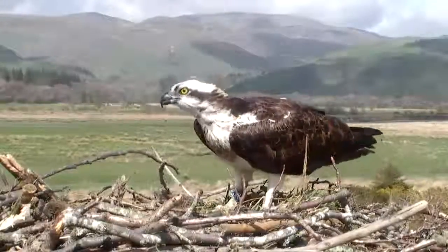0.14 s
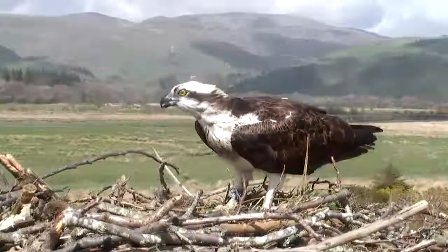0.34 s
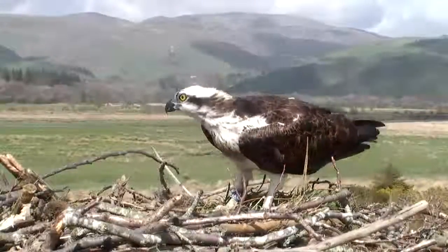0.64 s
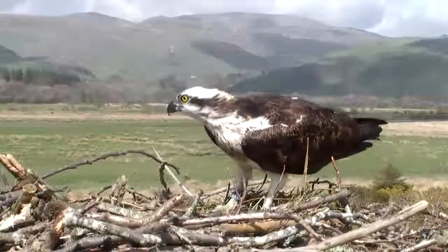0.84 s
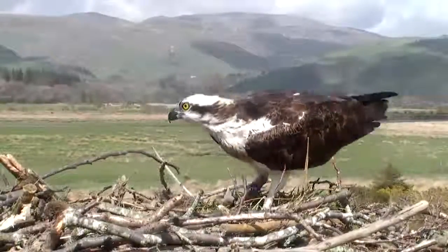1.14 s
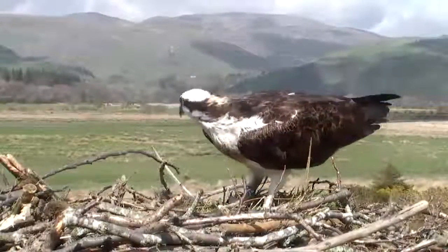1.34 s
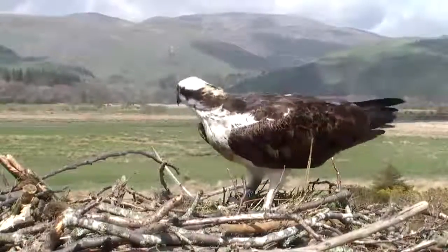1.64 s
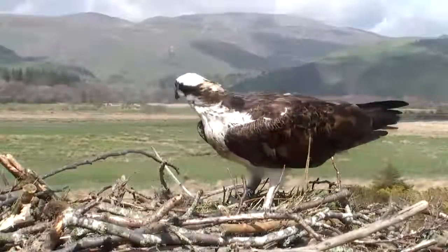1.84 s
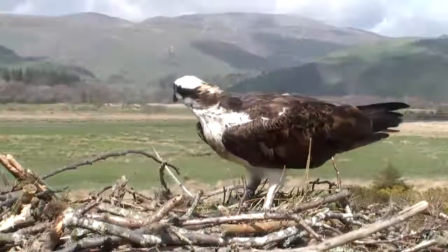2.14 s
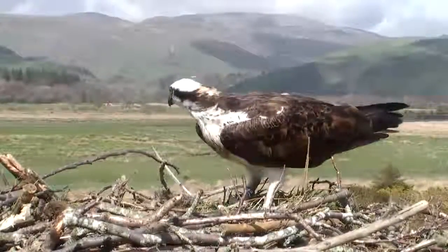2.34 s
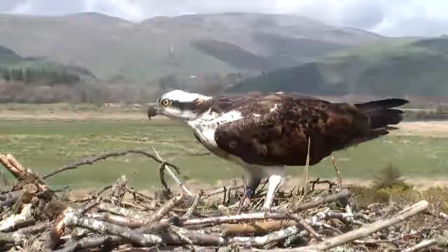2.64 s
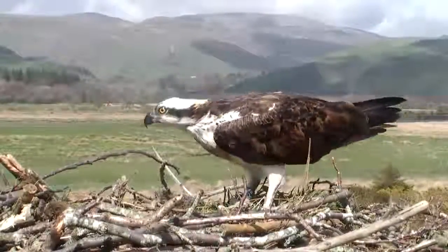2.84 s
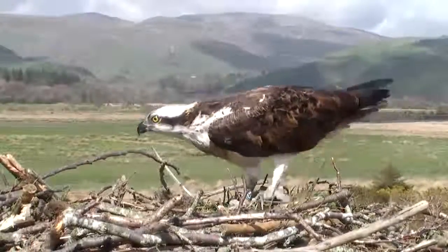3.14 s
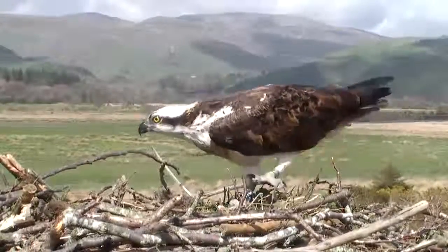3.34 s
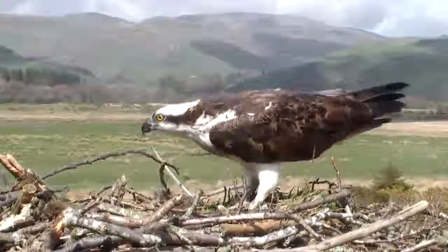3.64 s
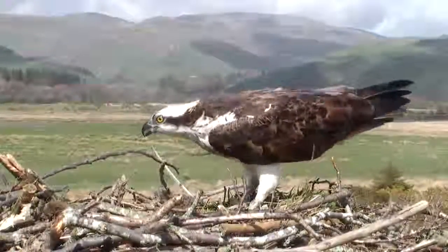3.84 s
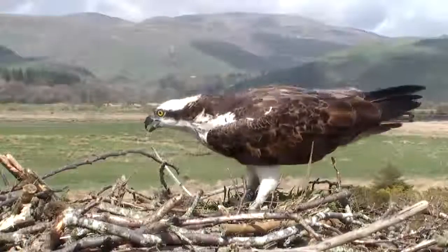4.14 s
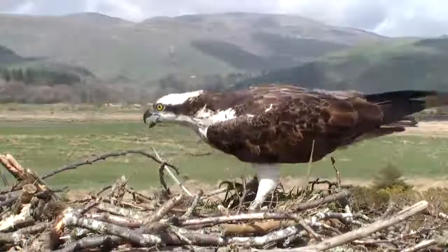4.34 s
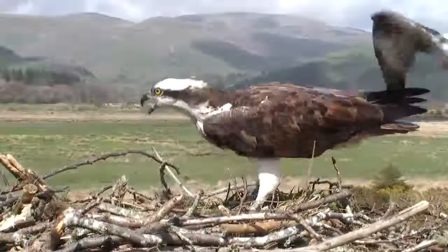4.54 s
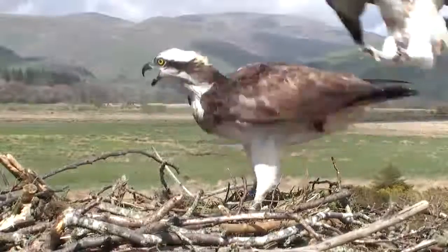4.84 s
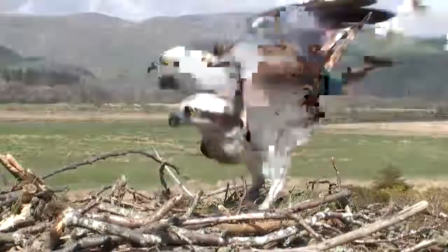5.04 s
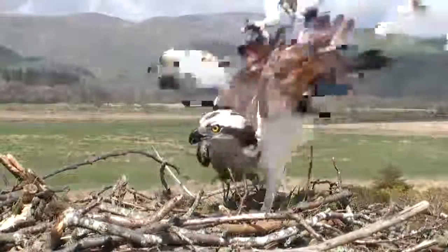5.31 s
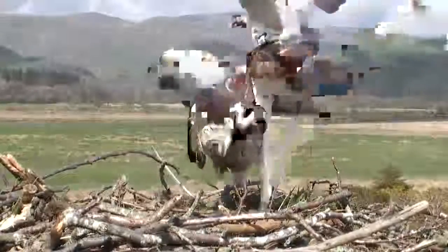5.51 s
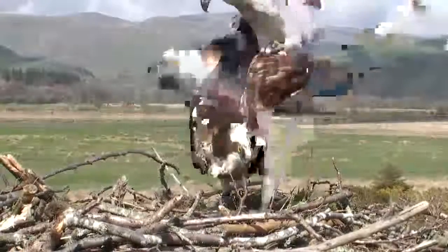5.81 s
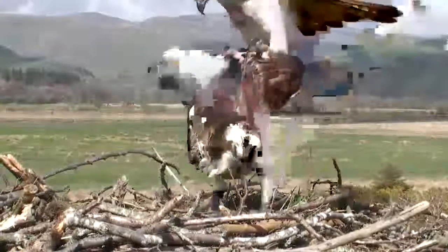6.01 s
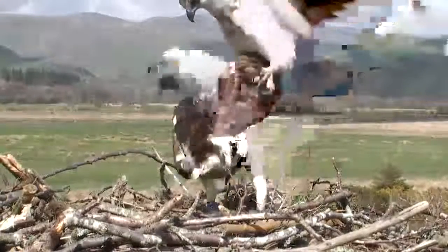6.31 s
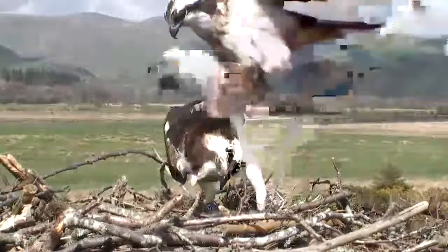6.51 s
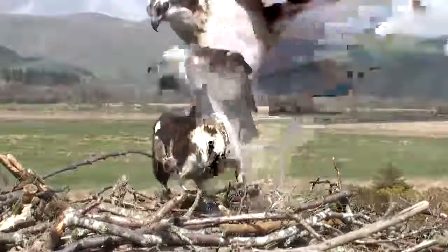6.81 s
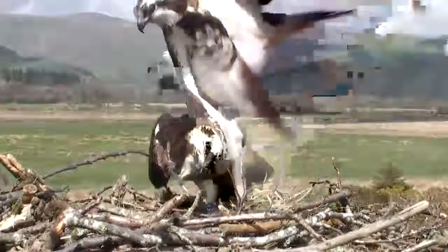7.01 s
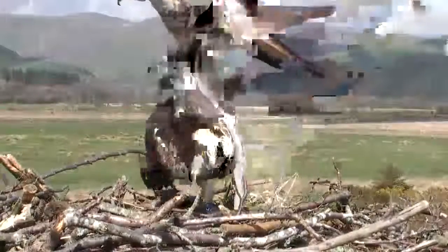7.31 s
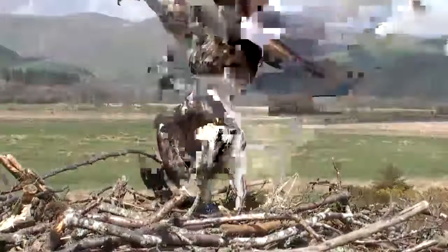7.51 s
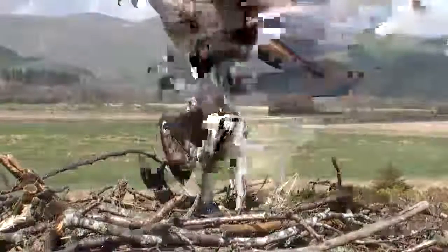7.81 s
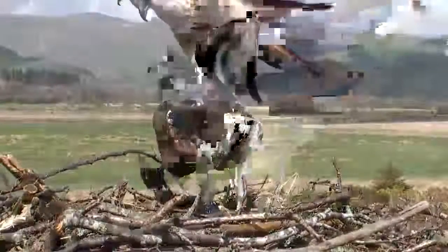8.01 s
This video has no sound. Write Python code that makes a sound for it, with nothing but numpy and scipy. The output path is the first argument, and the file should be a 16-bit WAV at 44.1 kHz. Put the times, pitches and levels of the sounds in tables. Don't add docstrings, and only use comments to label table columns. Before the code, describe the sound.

An osprey on a stick nest whistles quick raspy chirps while heavy wind gusts thump and distort the microphone and twigs snap.

```python
import sys
import numpy as np
from scipy import signal
from scipy.fft import rfft, irfft
from scipy.io import wavfile
from scipy.ndimage import uniform_filter1d, map_coordinates

SR = 44100
rng = np.random.default_rng(int(sys.argv[2]) if len(sys.argv) > 2 else 0)


def bounce(signal):
    frames = np.transpose(np.atleast_2d(signal))
    limited = np.clip(frames, -1, 1)
    pcm = np.round(limited * 32767).astype(np.int16)
    wavfile.write(sys.argv[1], SR, pcm)


def gain_from_db(level_db):
    decades = np.asarray(level_db, float) / 20
    return 10 ** decades


N = 359712


def unit(x):
    return x / np.sqrt(np.mean(x ** 2) + 1e-20)


def along(points, hz):
    f, v = np.transpose(points)
    return np.interp(np.log(hz + 1), np.log(f + 1), v)


def curve(rows):
    return np.interp(np.arange(N) / SR, *np.transpose(rows))


def swell(s, rise, hold, release):
    full = s + rise
    fading = full + hold
    return curve([(s, 0), (full, 1), (fading, 1), (fading + release, 0)])


def wobble(rate):
    return map_coordinates(rng.standard_normal(int(N * rate / SR) + 4), [np.arange(N) * rate / SR])


def smooth(x, size):
    return uniform_filter1d(uniform_filter1d(x, size=size), size=size)


def rush(spectrum, patchy_db):
    hz, _, z = signal.stft(rng.standard_normal(N), SR, nperseg=512)
    field = uniform_filter1d(rng.standard_normal(z.shape), size=5, axis=0)
    field = uniform_filter1d(field, size=10, axis=1)
    x = signal.istft(z * gain_from_db(patchy_db * unit(field)), nperseg=512)[1][:N]
    return unit(irfft(rfft(x) * gain_from_db(along(spectrum, np.fft.rfftfreq(N, 1 / SR))), N))


def clip(x, top, hard):
    return x / (1 + np.abs(x / top) ** hard) ** (1 / hard)


# f/Hz, level/dB
HISS_COLOUR = [(3530, 1), (6000, -8.5), (6910, -5.5), (8260, -9), (14000, -3.5), (15800, -11)]


def hiss(level_db, patchy_db):
    return gain_from_db(level_db) * rush(HISS_COLOUR, patchy_db)


# t/s, level/dB
WIND_STRENGTH = [(0.0, -40), (0.32, -38.5), (0.52, -36.5), (1.04, -34), (1.41, -38.5), (1.91, -33.5),
                 (2.88, -34.5), (3.7, -39.5), (3.95, -37), (4.36, -41.5), (4.82, -39), (5.31, -39),
                 (5.61, -37.5), (6.0, -31), (6.45, -42), (6.9, -40.5), (7.3, -42.5), (8.16, -45.5)]


def wind_db():
    return curve(WIND_STRENGTH)


# t/s, rise/s, hold/s, release/s, peak level/dB
GUST_TIMES = [(-.1, 0.046, 0.07, 0.092, -28), (0.084, 0.057, 0.05, 0.42, -19.5),
              (0.257, 0.089, 0.45, 0.14, -16.5), (0.798, 0.057, .2, 0.12, -23.5),
              (1.009, 0.027, 0.18, 0.04, -17), (1.148, 0.064, 0.058, 0.22, -25),
              (1.797, 0.071, .15, 0.091, -16), (1.747, 0.25, 0.61, 0.16, -17.5),
              (2.65, 0.034, 0.014, 0.071, -18), (4.28, 0.043, .02, 0.22, -24),
              (4.47, 0.34, 0.15, 0.098, -16.5), (4.9, 0.14, 0.058, 0.14, -25),
              (5.202, 0.18, 0.893, 0.31, -17), (6.304, 0.056, 0.088, 0.055, -19),
              (6.754, 0.14, 0.055, .04, -16), (6.94, 0.069, 0.029, 0.38, -18),
              (7.398, 0.17, 0.091, 0.45, -21.5), (7.779, 0.028, 0.065, 0.11, -16.5),
              (8.032, 0.04, 0.053, 0.08, -18.5)]
# t/s, length/ms
LULL_TIMES = [(.39, 30), (.735, 24), (.785, 14), (1.12, 8), (1.148, 10), (1.205, 30), (1.97, 24),
              (2.035, 12), (2.18, 8), (2.4, 12), (2.47, 24), (4.9, 12), (4.955, 20), (4.833, 10),
              (5.588, 14), (5.804, 9), (5.89, 18), (6.053, 11), (6.2, 14), (6.3, 18)]
# t/s, length/ms
SURGE_TIMES = [(.485, 40), (.65, 90), (.76, 20), (1.07, 30), (2.08, 90), (2.25, 40), (2.44, 24),
               (4.878, 20), (4.918, 12), (5.43, 60), (5.54, 70), (5.62, 40), (5.73, 80), (5.85, 40),
               (5.93, 40), (5.98, 100), (6.11, 80)]


def gust_strength():
    calm_db, t = wind_db() + 3.5, np.arange(N) / SR
    gust_db = np.max([calm_db + (db - calm_db) * swell(*shape) for *shape, db in GUST_TIMES], axis=0)
    gust_db = gust_db + 0.95 * np.maximum(gust_db + 19, 0)
    for changes, change_db in ((LULL_TIMES, -14), (SURGE_TIMES, 9)):
        for s, ms in changes:
            gust_db = gust_db + change_db * np.exp(-((t - s) / (ms / 1600)) ** 4)
    return gust_db


# f/Hz, level per Hz/dB
FIELD_COLOUR = [(53, -32), (90, 6), (302, 1), (423, -4), (475, -5), (622, -5), (885, -18), (1010, -18.5),
                (1590, -29.5), (2350, -34), (5000, -57.5), (6500, -63.5), (11000, -120)]


def roar(gust_db):
    level_db = wind_db() + 3.5 + 0.1 * np.maximum(gust_db + 20, 0)
    level_db = level_db + 0.52 * wobble(6.1) + 0.12 * wobble(25)
    return gain_from_db(level_db) * rush(FIELD_COLOUR, patchy_db=1)


# f/Hz, level/dB
FEATHER_COLOUR = [(800, -37.5), (2000, -0.5), (3500, -4.5), (6000, -10), (9000, -17.5), (13000, -39.5)]


def spray(gust_db):
    level_db = -71.5 + 0.65 * np.clip(gust_db + 21, -15, 14) + 4 * wobble(60)
    return gain_from_db(level_db) * rush(FEATHER_COLOUR, patchy_db=4.5)


# t/s, rise/s, hold/s, release/s, level/dB
WING_BEATS = (4.53, 0.44, 1.54, 0.34, 5.5)


def rustle():
    *shape, wings_db = WING_BEATS
    level_db = -71.5 + 0.37 * (wind_db() + 40) + wings_db * swell(*shape)
    flicker_db = 1.8 * wobble(30) + 1.4 * wobble(120)
    return gain_from_db(level_db + flicker_db) * rush(FEATHER_COLOUR, patchy_db=2)


# f/Hz, level per Hz/dB
BUFFET_COLOUR = [(10, -28), (25, -5.5), (42, 1.5), (60, 0), (90, -8), (150, -27), (300, -35.5),
                 (600, -46.5), (1200, -87.5), (4000, -120)]
# f/Hz, level per Hz/dB
SLAP_COLOUR = [(40, -40), (90, 0), (140, -5), (260, -20), (1500, -120)]


def buffeting(gust_db):
    buffet = gain_from_db(gust_db) * unit(gain_from_db(3.5 * wobble(14)) * rush(BUFFET_COLOUR, patchy_db=0.5))
    slaps = gain_from_db(1.3 * gust_db - 12) * unit(gain_from_db(3 * wobble(9)) * rush(SLAP_COLOUR, patchy_db=1))
    return buffet + slaps


# t/s, held/ms (negative for the inward side)
PIN_TIMES = [(.5105, -3.6), (.5285, 6), (.537, -6), (.7505, 3), (.758, -4), (.7685, 4.5), (1.0881, 6.8),
             (1.0965, -7), (1.1052, 9), (1.118, 4), (1.1275, -6.5), (1.1365, 7), (1.154, -7.5),
             (1.1652, 9.5), (1.1775, -6.5), (2.0134, -5.1), (2.0212, 7.1), (2.046, 5.3), (2.0628, -6.3),
             (2.0709, 4.6), (2.0772, -3.8), (2.083, 3), (2.0873, -4), (2.0936, 7.9), (2.1594, 6.1),
             (2.1675, -7.3), (2.1804, 4), (2.2246, -4.5), (2.2367, 3.2), (2.377, -5.3), (2.3893, 5.4),
             (2.4415, -4), (2.4487, 6.6), (4.8575, 9.2), (4.8728, -6.1), (4.8805, 5), (4.9125, 4),
             (4.9199, -3.9), (5.5029, -4), (5.5131, -3.6), (5.5185, 10.5), (5.532, -9.4), (5.5428, 12.2),
             (5.5567, -4.1), (5.5683, -6), (5.5765, 4), (5.5865, -3.8), (5.5963, 6.4), (5.6044, -7.6),
             (5.8106, 6.4), (5.854, 7.1), (5.8627, -5.3), (5.915, -4.5), (5.9214, 6.9), (6.0363, -3.4),
             (6.0625, -5), (6.0941, 4.9), (6.1008, -6.9), (6.1095, 6.2), (6.3122, 4.5)]
# t/s, side
GRAZE_TIMES = [(.518, 1), (.524, -1), (.546, 1), (.5555, 1), (.5625, -1), (.5675, 1), (.574, -1), (.583, 1),
               (.592, -1), (.781, -1), (.797, 1), (1.188, 1), (1.2, -1), (2.033, -1), (2.19, -1),
               (2.2455, -1), (2.251, 1), (2.2565, -1), (2.2625, 1), (2.2695, -1), (2.4, -1), (2.459, -1),
               (4.897, -1), (4.932, 1), (5.8, 1), (5.805, -1), (6.0445, 1), (6.0575, 1), (6.322, -1)]


def throws(buffet):
    push, graze = np.zeros(N), np.zeros(N)
    for s, ms in PIN_TIMES:
        start, end = s - .0004, s + abs(ms) / 1000 + .0004
        push[round(start * SR):round(end * SR)] = np.sign(ms)
    s, side = np.transpose(GRAZE_TIMES)
    graze[np.round(s * SR).astype(int)] = side
    graze = np.convolve(graze, np.hanning(round(.009 * SR)), "same")
    shelter = smooth(np.abs(push) + np.abs(graze), round(.009 * SR / 2))
    calm = 1 - np.clip(2.2 * shelter, 0, .9)
    swing = smooth(push, round(.0044 * SR / 2))
    return buffet * calm + .62 * swing + .3 * graze


def wind():
    gust_db = gust_strength()
    return throws(buffeting(gust_db)) + roar(gust_db) + spray(gust_db)


# t/s, peak level/dB
SNAP_TIMES = [(0.464, -53), (0.496, -50), (0.6322, -41), (0.6418, -37), (0.6722, -45), (1.097, -35),
              (1.1033, -37.5), (1.134, -28.5), (1.161, -43), (1.175, -49), (1.183, -45), (2.046, -35.5),
              (2.0614, -39), (2.0665, -42), (2.077, -26), (2.0823, -36), (2.091, -38), (2.2458, -37),
              (4.854, -44.5), (4.8807, -42), (4.9195, -47), (5.415, -36), (5.4412, -47), (5.511, -38),
              (5.541, -46), (5.567, -38), (5.602, -32), (5.622, -47), (5.7248, -46), (5.79, -34),
              (5.8611, -48), (5.92, -31), (5.9444, -40), (5.997, -37), (6.098, -32.5), (6.107, -37)]


def snaps():
    u, out = np.arange(-40, 41) / (0.000097 * SR), np.zeros(N)
    s, db = np.transpose(SNAP_TIMES)
    out[np.round(s * SR).astype(int)] = gain_from_db(db + 2.5) * rng.choice([-1, 1], len(s))
    return np.convolve(out, u * np.exp(1 - np.abs(u)), "same")


# f/Hz, time to fade by 60 dB/s
SCATTER_FADE = [(1000, 0.74), (3000, 0.33), (8000, 0.13)]
# f/Hz, sharpness, level/dB
HOLLOW_TONES = [(2300, 7, -7.5), (3050, 6, -1), (4900, 6, -7)]
# delay/s, level/dB
ECHO_TIMES = [(.021, -37.5), (.054, -27), (.062, -33), (.07, -35.5), (.087, -43), (.105, -38)]


def surroundings(x):
    hz, t, z = signal.stft(rng.standard_normal(SR // 2), SR, nperseg=256)
    fade = gain_from_db(-60 * t / along(SCATTER_FADE, hz)[:, None])
    tail = signal.istft(z * fade, SR, nperseg=256)[1]
    answer = gain_from_db(-24.5) * signal.fftconvolve(x, tail / np.linalg.norm(tail))[:N]
    hollow = sum(gain_from_db(db) * signal.lfilter(*signal.iirpeak(hz, sharp, SR), x) for hz, sharp, db in HOLLOW_TONES)
    for delay, db in ECHO_TIMES:
        answer += gain_from_db(db) * np.pad(hollow, (round(delay * SR), 0))[:N]
    return answer


# t/s, peak level/dB
BUMP_TIMES = [
    (6.635, -36),
    (6.705, -34),
    (6.821, -38.5),
    (6.887, -35),
    (6.931, -32.5),
    (7.038, -42),
    (7.085, -60),
    (7.161, -38),
]


def bumps():
    out, t = np.zeros(N + SR), np.arange(SR // 20) / SR
    for s, db in BUMP_TIMES:
        out[round(s * SR):][:len(t)] += gain_from_db(db - 60 * t / 0.062) * rng.standard_normal(len(t))
    return signal.sosfilt(signal.butter(2, [300, 1630], "band", fs=SR, output="sos"), 2 * out[:N])


# t/s, peak level/dB, knock level/dB
TWIG_SNAPS = [(0.34, -37, -10), (2.5028, -38, -1), (2.722, -41.5, 1), (3.2912, -33, -7), (3.479, -38.5, -7),
              (4.605, -48, 5.5), (4.7695, -35.5, -5), (4.8142, -33, -6), (5.88, -44, -11), (6.248, -48, 7),
              (6.4743, -38, -1.5), (6.702, -49.5, -12), (6.887, -46, -16), (6.931, -54, -16),
              (7.164, -50, 1), (7.7132, -46, -6), (7.804, -36, -3)]


def twigs():
    out, t = np.zeros(N + SR), np.arange(SR // 20) / SR
    for s, db, knock_db in TWIG_SNAPS:
        crack = np.diff(rng.standard_normal(len(t) + 1)) * gain_from_db(-60 * t / .02 - 8)
        knock = gain_from_db(knock_db - 60 * t / 0.059) * np.sin(2 * np.pi * 1520 * t)
        knock = knock * (1 - np.exp(-t / 0.0012))
        out[round(s * SR):][:len(t)] += gain_from_db(db) * (crack + knock)
    return signal.sosfilt(signal.butter(2, 7800, fs=SR, output="sos"), out[:N])


RISE_RASP_DB = -34
BREAK_HZ = 2750

# t/s, length/ms, start f/Hz, end f/Hz, level/dB
RISING_WHISTLES = [(.077, 48, 2453, 2930, -43), (0.296, 45, 2280, 2460, -38.5),
                   (.514, 54.5, 2300, 2608, -34.5), (0.718, 53, 2270, 2580, -35),
                   (.917, 13.3, 2584, 3110, -40.5), (1.116, 34.7, 2200, 2600, -36.5),
                   (1.324, 51, 2223, 2620, -35), (1.538, 37, 2260, 2664, -38),
                   (1.74, 27.4, 2215, 2610, -38), (1.949, 22, 2120, 2530, -39.5),
                   (2.171, 20, 2186, 2525, -40.5), (2.38, 27, 1950, 2436, -39.5),
                   (2.607, 34, 2060, 2414, -39), (2.846, 58, 1997, 2434, -39),
                   (3.151, 33, 1970, 2325, -37.5), (3.412, 38, 2490, 2840, -39.5),
                   (3.65, 29, 2550, 2900, -39), (3.868, 40, 2615, 2810, -37), (4.089, 55, 2110, 2494, -38),
                   (4.334, 65, 2084, 2243, -38.5), (4.641, 35, 2620, 3570, -42),
                   (4.892, 33, 2320, 3370, -33), (5.121, 30, 2480, 3980, -35)]
# t/s, length/ms, start f/Hz, level/dB, tail level/dB
FALLING_WHISTLES = [(0.12, 21, 2930, -40.5, -39.5), (0.329, 24.5, 2495, -36, -74),
                    (0.567, 22.7, 2535, -32.5, -71), (.771, 19, 3040, -39, -36.5),
                    (0.967, 29.3, 3290, -38.5, -37), (1.175, 33, 3470, -39.5, -38),
                    (1.39, 20, 3206, -41.5, -34), (1.596, 32.4, 3290, -42, -38.5),
                    (1.808, 22, 3280, -40, -43.5), (2.024, 20.6, 3430, -43, -46),
                    (2.239, 26.3, 3420, -42.5, -48), (2.453, 33, 3170, -41, -46),
                    (2.685, 29.4, 3180, -41.5, -56), (2.916, 18, 2910, -42, -41.5),
                    (3.215, 24, 2916, -37, -39.5), (3.46, 45, 3220, -40, -33),
                    (3.71, 26.3, 3220, -40.5, -27.5), (3.927, 32, 3390, -39.5, -32),
                    (4.158, 22.5, 3140, -38, -37), (4.405, 22.7, 3310, -37.5, -34),
                    (4.674, 19, 3660, -45, -36.5), (4.943, 13, 3660, -29, -36.5),
                    (5.167, 11.7, 4140, -28.5, -36.5)]
# t/s, tail f/Hz, tail length/ms, fall rasp level/dB, tail rasp level/dB
HOARSENESS = [(.1, 2355, 18.4, -38, -34), (.77, 2406, 16.5, -21, -27), (.97, 2350, 15.2, -17, -35),
              (1.4, 2430, 15.5, -25, -22), (1.81, 2390, 25, -28, -27), (2.03, 2160, 20, 0, -9),
              (2.45, 2230, 16, -17, -25), (2.92, 2230, 18.5, -16, -15), (3.22, 2210, 16, -17.5, -29),
              (3.71, 2200, 10.7, -12, -31), (4.16, 2202, 23, -16, -20), (4.41, 2220, 17.6, -16, -18.5),
              (4.67, 2200, 28.4, -29, -15), (5.17, 2366, 31.7, -34, -14.5)]
# t/s, f/Hz
CREST_TOPS = [(.9, 3150), (1.55, 3140), (1.72, 3784), (2.63, 3710), (2.82, 2925), (3.17, 2890), (3.4, 3350),
              (3.65, 3240), (3.87, 3700), (4.1, 3367), (4.89, 3770), (5.12, 4370)]
# t/s, length/ms, start f/Hz, end f/Hz, level/dB
CALL_SCRAPS = [(4.396, 6, 2340, 3580, -46), (2.838, 8, 1920, 2060, -50), (6.286, 9, 1800, 2300, -52),
               (5.348, 22, 2480, 3330, -50), (5.424, 33, 2230, 1900, -46), (5.583, 3.8, 2940, 3770, -20.5),
               (5.592, 1.8, 3450, 4040, -21.5), (5.662, 6.3, 2220, 1930, -36.5),
               (5.797, 17.3, 2800, 4180, -30.5), (5.816, 10, 3630, 6240, -49), (5.881, 9, 6170, 4120, -40),
               (5.892, 10, 2420, 2230, -45), (6.047, 16.5, 2330, 2320, -33.5), (6.323, 25, 2930, 6340, -53),
               (6.396, 17, 6130, 3470, -43.5), (6.655, 8, 5700, 4110, -35.5),
               (7.712, 8.6, 3080, 2230, -53.5), (6.596, 16, 4060, 6300, -54), (6.866, 14, 4420, 6420, -62),
               (7.068, 15, 4940, 6260, -59), (6.04, 9, 6700, 5780, -46), (6.068, 12, 3880, 5600, -49)]
# t/s, length/ms, start f/Hz, end f/Hz, level/dB
LANDING_YELPS = [(6.297, 20.3, 2380, 2586, -33), (6.314, 15.7, 2540, 2660, -32),
                 (6.349, 63, 2480, 2650, -59), (6.404, 16, 3140, 3000, -37.5),
                 (6.41, 15.4, 2620, 2100, -32), (6.425, 8.4, 2480, 2040, -35), (6.565, 21, 2334, 2484, -35),
                 (6.58, 26, 3060, 2480, -39), (6.657, 6.9, 4180, 1860, -42), (6.662, 23, 2640, 2110, -33),
                 (6.829, 23.6, 2280, 2600, -34), (6.846, 16, 3050, 2900, -37.5),
                 (6.857, 12.6, 2900, 2460, -42), (7.043, 20, 2310, 2555, -37), (7.055, 14, 2720, 2980, -38),
                 (7.061, 15.4, 2880, 2340, -45), (7.162, 24, 2480, 2300, -41.5),
                 (7.175, 17, 2300, 2180, -53)]


def crest(s, gap_ms, rise_hz, rise_db, rasp_db):
    if gap_ms <= 6:
        return []
    top_hz = np.interp(s[0], *np.transpose(CREST_TOPS))
    broken = rise_hz < BREAK_HZ
    from_hz = rise_hz * (1.13 if broken else 1)
    steps = [(from_hz, top_hz)]
    if broken and top_hz > 1.2 * from_hz:
        steps = [(from_hz, 1.076 * from_hz), (.97 * top_hz, top_hz)]
    step_ms, rows = gap_ms / len(steps), []
    for k, (a, b) in enumerate(steps):
        db = rise_db - 2.5 - 5 * (len(steps) - 1) - 11 * ((a + b) / 2 - BREAK_HZ) / 1000
        ms = step_ms + 13 - 5 * (b > 3500)
        rows.append((s[1] + (k * step_ms - 4) / 1000, ms, a, b, db, rasp_db))
    return rows


def notes():
    rows = [(*row, -18.5 - 2.5 * abs(row[3] - row[2]) / 1000) for row in CALL_SCRAPS]
    rows += [(*row, -23.5) for row in LANDING_YELPS]
    times, *hoarse = np.transpose(HOARSENESS)
    for rise, fall in zip(RISING_WHISTLES, FALLING_WHISTLES):
        s, ms, low_hz, high_hz, db = rise
        fall_s, fall_ms, peak_hz, fall_db, tail_db = fall
        tail_hz, tail_ms, fall_rasp_db, tail_rasp_db = [np.interp(fall_s, times, c) for c in hoarse]
        fall_end_hz = 2677 if peak_hz > BREAK_HZ else 0.843 * peak_hz
        tail_end_hz = (0.86 + 0.0028 * (tail_ms - 16)) * tail_hz
        tail_s = fall_s + (fall_ms - 2) / 1000
        rows.append((s, ms, low_hz, high_hz, db, RISE_RASP_DB))
        rows.append((fall_s, fall_ms + 2, peak_hz, fall_end_hz, fall_db, fall_rasp_db))
        rows.append((tail_s, tail_ms, tail_hz, tail_end_hz, tail_db, tail_rasp_db))
        crest_s = s + ms / 1000
        rows += crest((s, crest_s), 1000 * (fall_s - crest_s), high_hz, db, (fall_rasp_db - 26) / 2)
    return rows


def glide(u, ms, start_hz, end_hz):
    if end_hz > start_hz:
        ease = .6 if end_hz - start_hz < 700 else .2
        bend = (1 + ease) * u - ease * u ** 2
    elif (start_hz - end_hz) / ms < 50:
        bend = .4 * u + 0.84 * u ** 2
    else:
        bend = 1.6 * u - 0.43 * u ** 2
    arch = .075 * (ms > 65) * np.sin(np.pi * u ** .7)
    return (start_hz + (end_hz - start_hz) * bend) * (1 + arch)


# f/Hz, level/dB
THROAT_COLOUR = [(800, -1.5), (1500, 2), (2000, 4.5), (2350, 4.5), (2700, 7), (3100, 4), (3700, -2.5),
                 (4400, -2), (5300, -8.5), (6300, -3), (7300, -6.5), (8800, -30), (13000, -38)]
# multiple, level/dB
WHISTLE_OVERTONES = [(1, 2.5), (2, -12), (3, -18), (4, -29), (5, -27.5)]
# t/s, overtone level/dB
BEAK_OPENING = [(0, -1.5), (.6, 0), (.95, -2), (1.3, -0.5), (1.6, -5), (2, 1.5), (2.4, 4), (2.7, 5.5),
                (2.95, -2.5), (3.5, -3), (4.1, -3), (4.4, -1.5), (4.9, 2), (5.2, 3), (5.8, -6), (6.3, 3.5),
                (6.7, -2.5), (7.2, 0.5)]


def whistle(s, ms, start_hz, end_hz, db, rasp_db):
    t = np.arange(int((ms + 4) * SR / 1000)) / SR
    u, rising, landing = t / t[-1], rasp_db == RISE_RASP_DB, s > 5.4
    rasp_db = min(rasp_db, -12)
    shake, drift, tremor, flicker = [np.interp(t, np.arange(100) / rate, rng.standard_normal(100))
                                     for rate in (950, 503, 255, 164)]
    unsteady = .06 * gain_from_db(rasp_db) + .002 + .02 * landing
    pitch = glide(u, ms, start_hz, end_hz) * (1 + unsteady * shake)
    phase = 2 * np.pi * np.cumsum(pitch) / SR
    split = max(round(pitch.mean() / 753), 2)
    if 3.17 < s < 3.24:
        split = 2
    base_db = np.percentile(along(THROAT_COLOUR, pitch), 70)
    beak_db = np.interp(s, *np.transpose(BEAK_OPENING)) + rng.normal(0, 1.5) - 5.5 * rising
    voice = np.zeros(len(t))
    for k, level_db in WHISTLE_OVERTONES:
        if k > 1:
            level_db = level_db + beak_db - 8.5 * rising * (u - .5) + 5 * np.roll(flicker, 310 * k)
        for side in (-2, -1, 0, 1, 2):
            ratio = k + side / split
            line_db = level_db + along(THROAT_COLOUR, ratio * pitch) - base_db
            if side != 0:
                line_db = line_db + rasp_db + (k > 1) - 6 * (abs(side) - 1) - 3.6 * side
            voice += gain_from_db(line_db) * np.sin(ratio * phase + side * (k + 0.4 * drift))
    air = uniform_filter1d(uniform_filter1d(rng.standard_normal(len(t)), size=40), size=30)
    carrier = np.sin(phase) + gain_from_db(beak_db - 11) * np.sin(2 * phase) + gain_from_db(beak_db - 20) * np.sin(3 * phase)
    voice += gain_from_db(max(rasp_db, -24) + 17 + 6 * landing) * air * carrier
    fade_out = (t[-1] - t) / (.005 if rising else .009)
    edges = np.clip(np.minimum(t / 0.0072, fade_out), 0, 1) ** 1.57
    return gain_from_db(db + 5 + (1.1 if rising else 1.4) * tremor) * edges * voice


def bird():
    out = np.zeros(N + SR)
    for note in notes():
        voice = whistle(*note)
        out[round((note[0] - .002) * SR):][:len(voice)] += voice
    return out[:N]


def scene():
    air = wind() + rustle()
    near = twigs() + bird() + bumps()
    return (near + surroundings(near) + air)[None]


def band_limit(x):
    return signal.sosfilt(signal.butter(12, 15940, fs=SR, output="sos"), x)


def record(dry):
    x = dry + hiss(-68.7, patchy_db=1.5)
    x = clip(x, top=.285, hard=30) + snaps()
    x = signal.sosfilt(signal.butter(1, 31, "high", fs=SR, output="sos"), x)
    x = clip(x, top=.258, hard=24)
    x = x + hiss(-76.5, patchy_db=1)
    x = irfft(rfft(x) * (np.fft.rfftfreq(N, 1 / SR) < 15850), N)
    mix = x * np.minimum((N - np.arange(N)) / (.004 * SR), 1)
    return band_limit(mix)


dry = scene()
out = record(dry)
bounce(out)
```